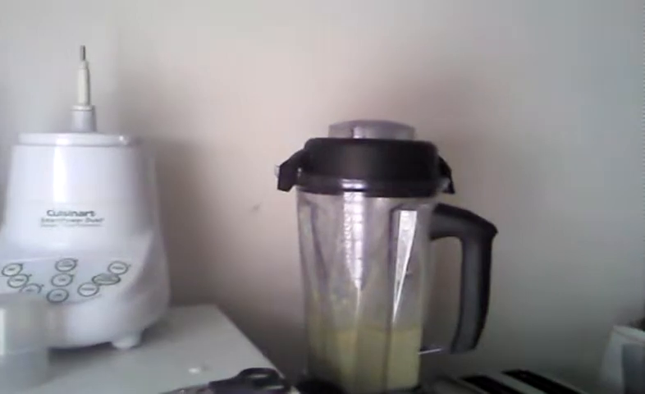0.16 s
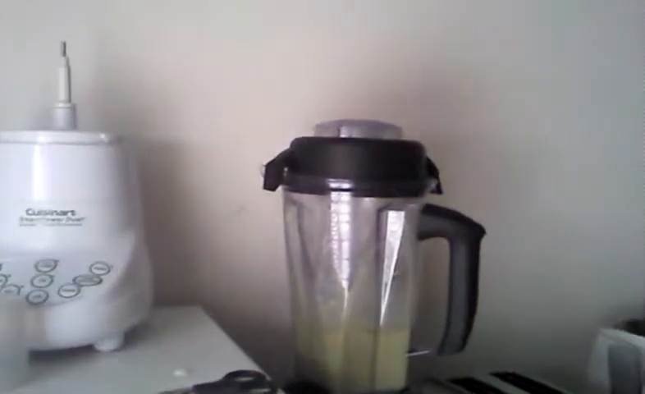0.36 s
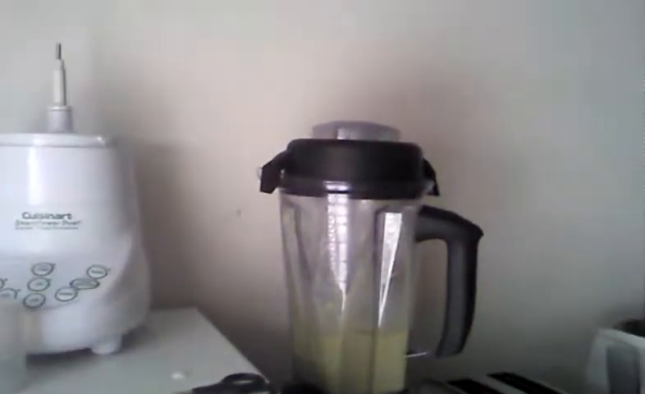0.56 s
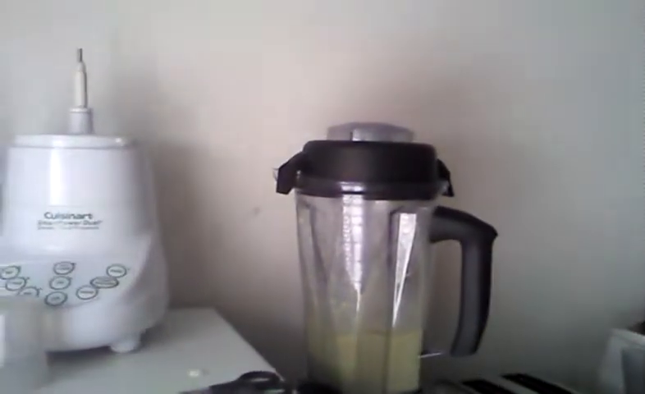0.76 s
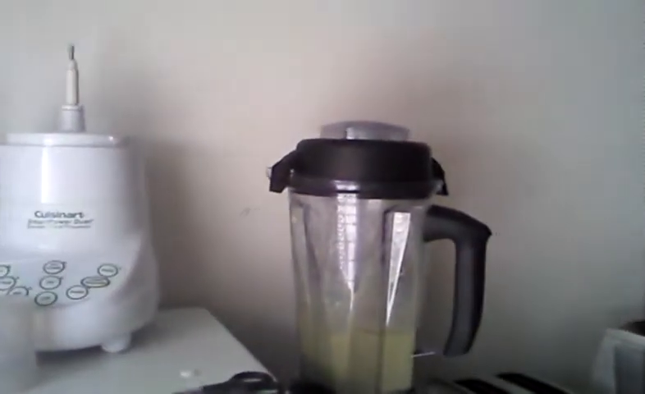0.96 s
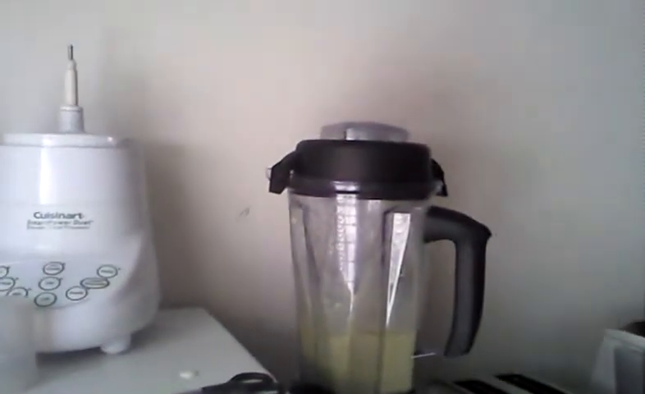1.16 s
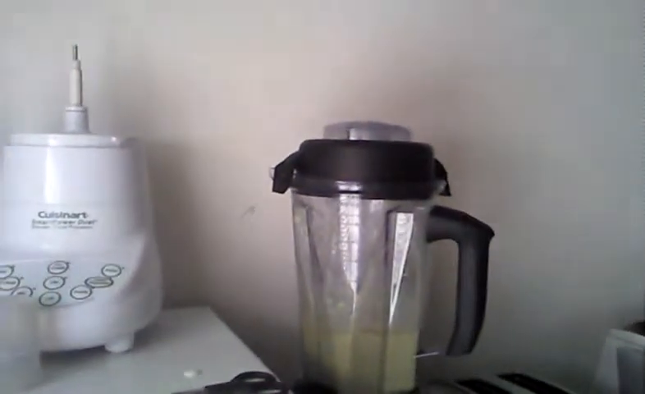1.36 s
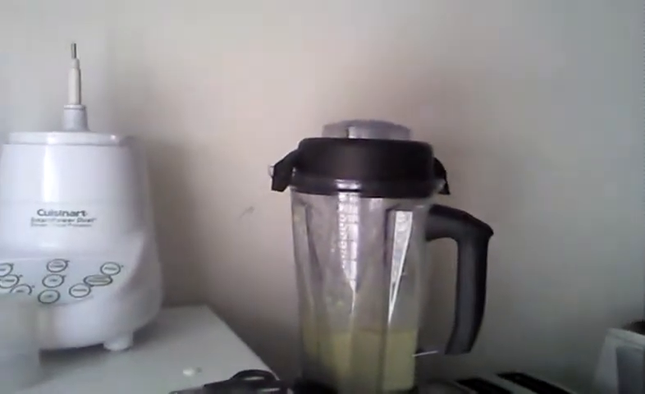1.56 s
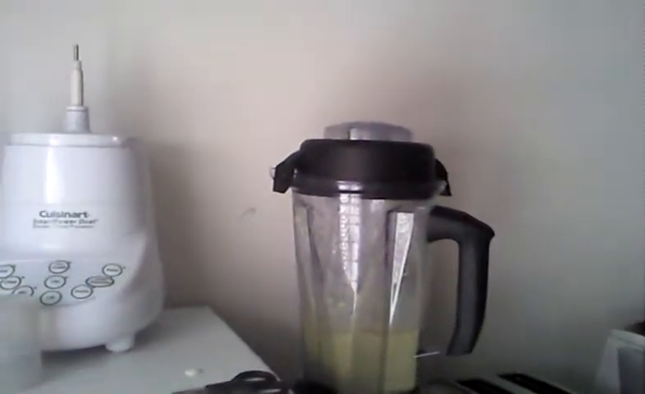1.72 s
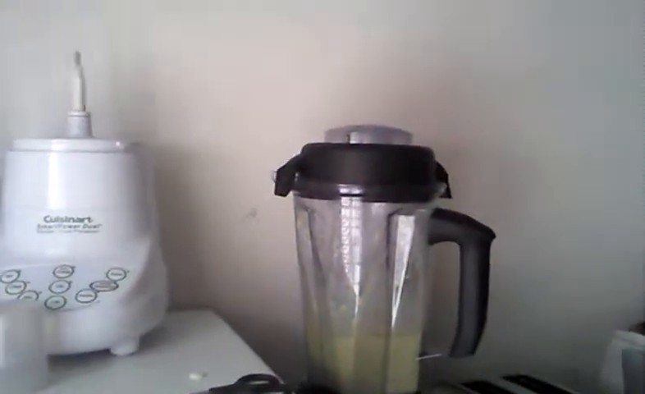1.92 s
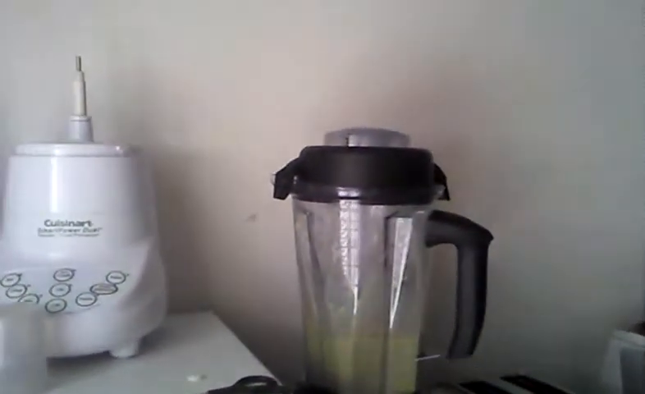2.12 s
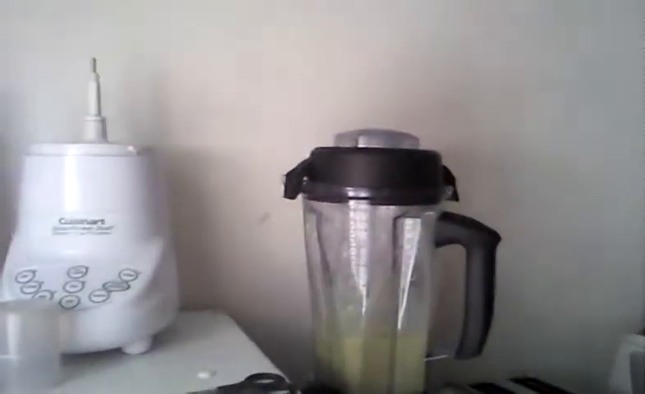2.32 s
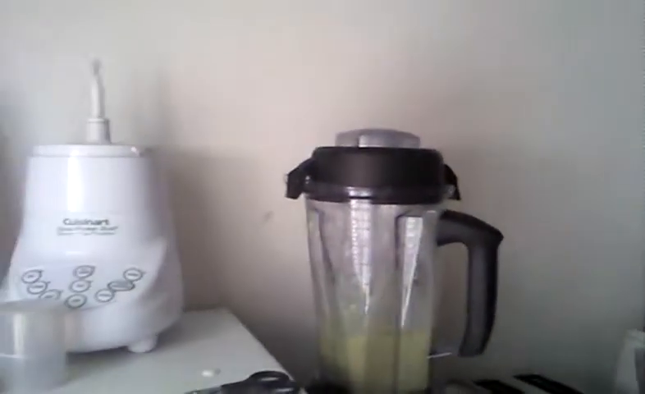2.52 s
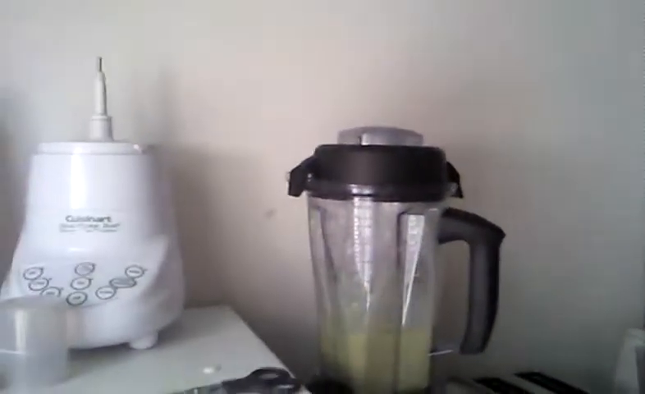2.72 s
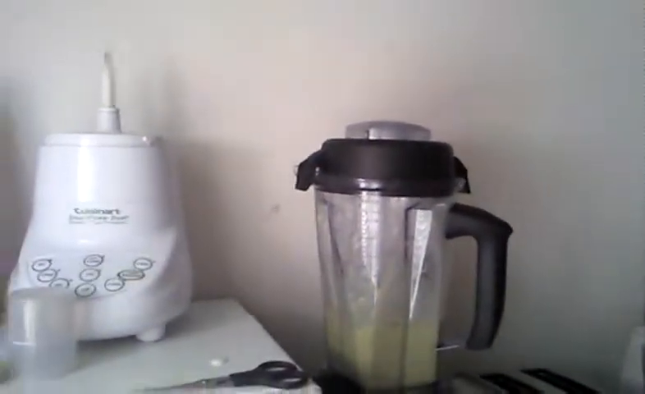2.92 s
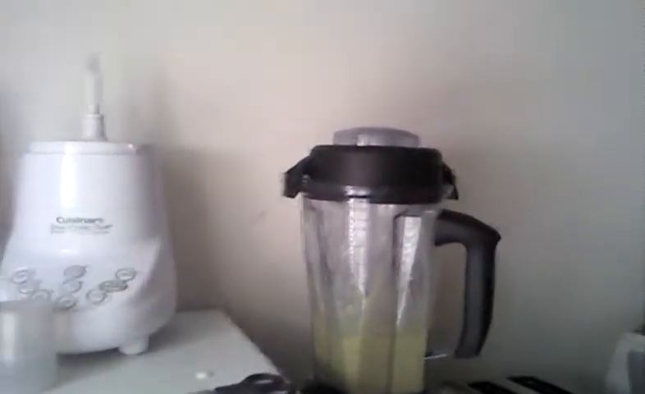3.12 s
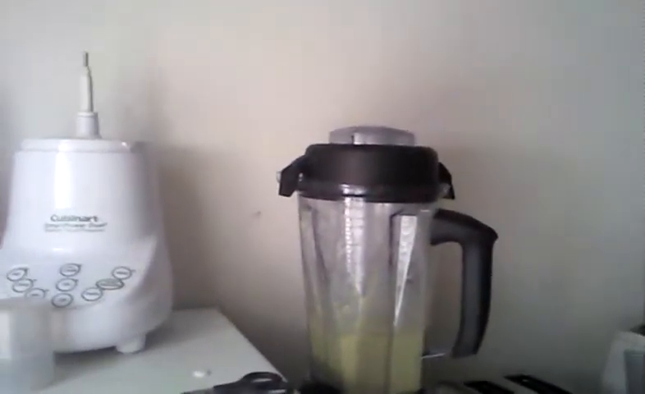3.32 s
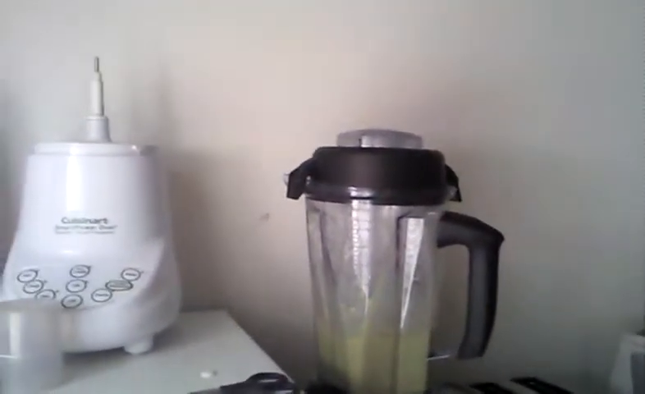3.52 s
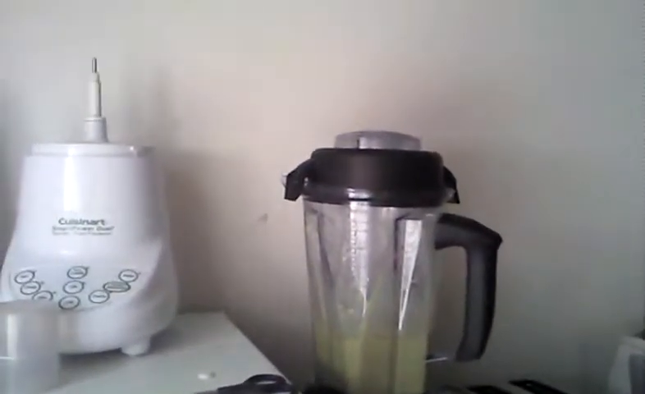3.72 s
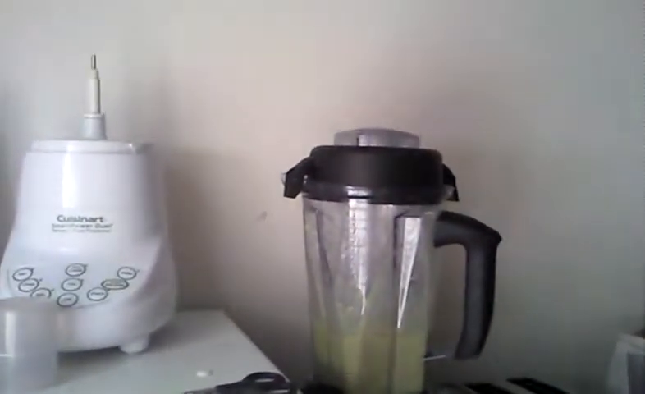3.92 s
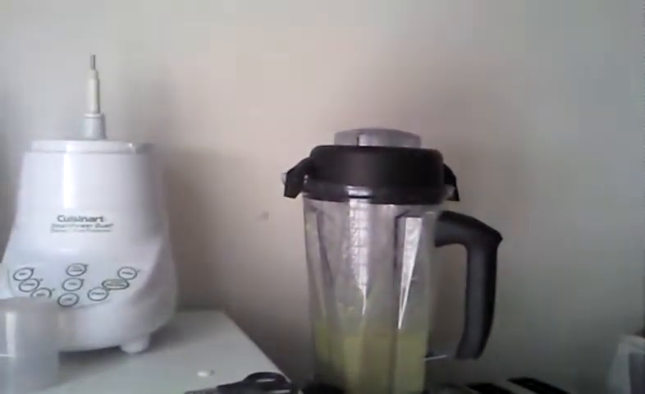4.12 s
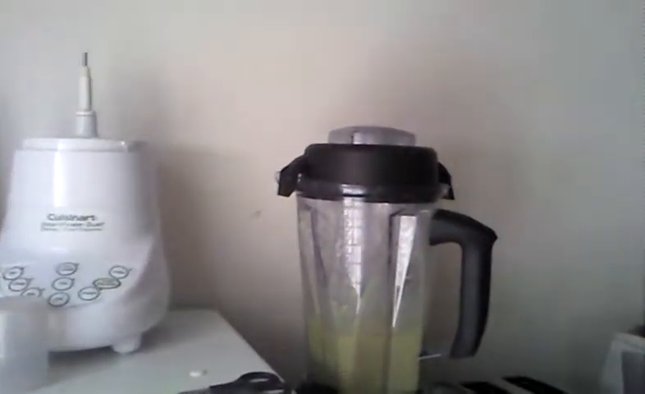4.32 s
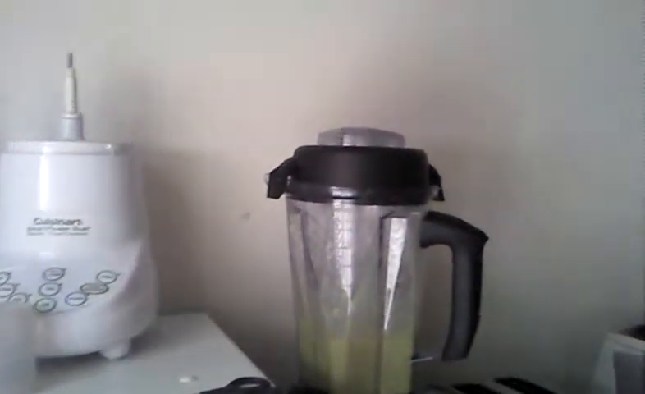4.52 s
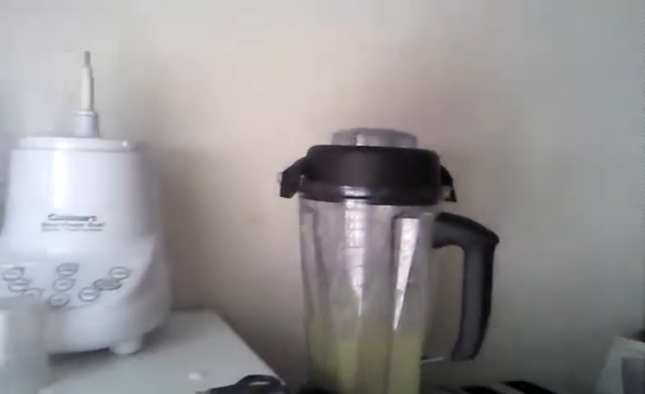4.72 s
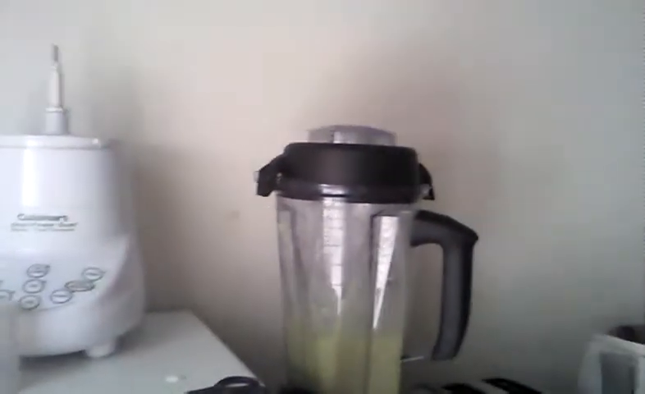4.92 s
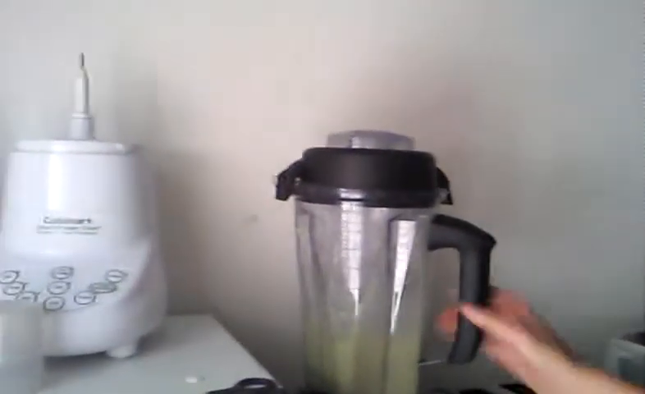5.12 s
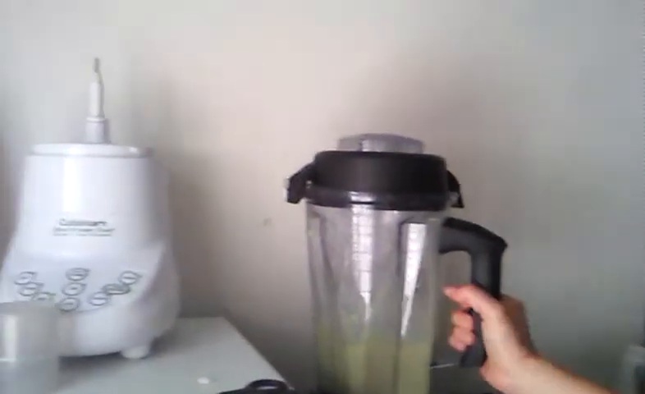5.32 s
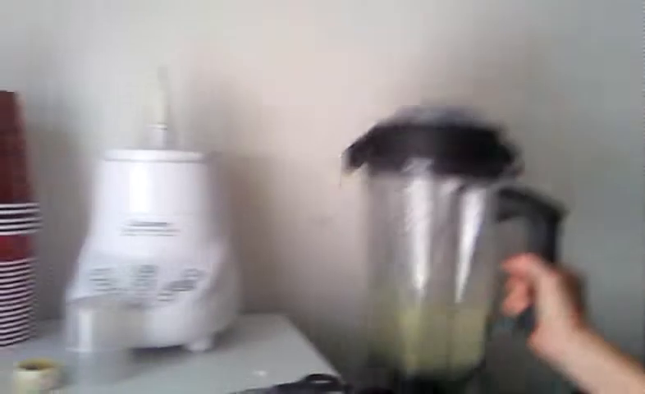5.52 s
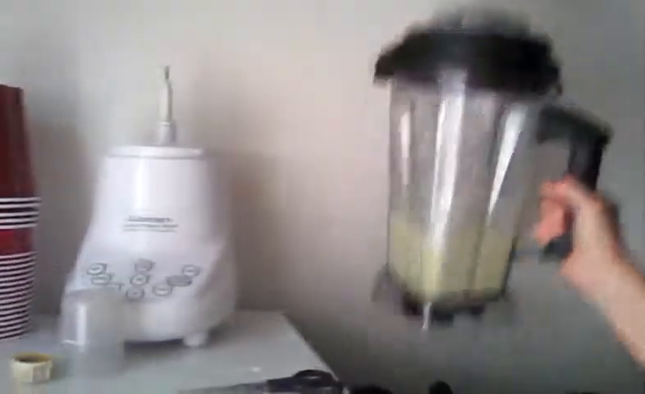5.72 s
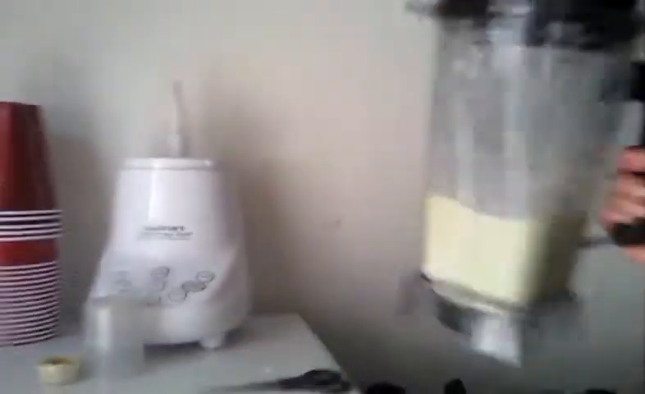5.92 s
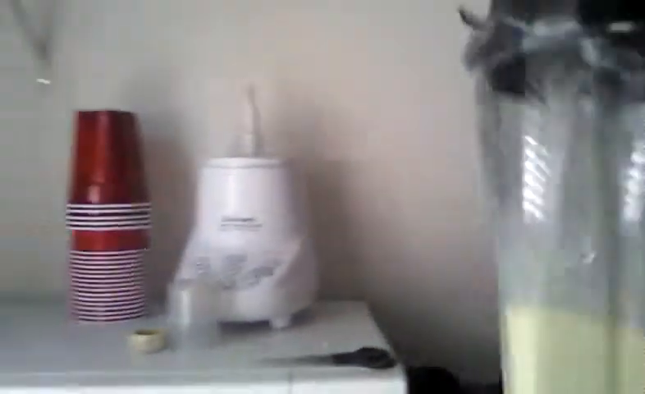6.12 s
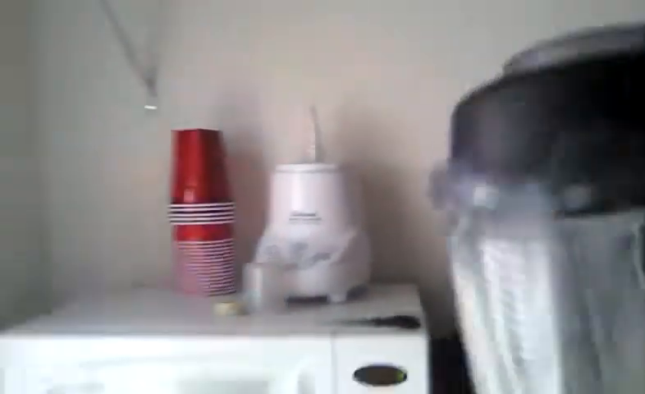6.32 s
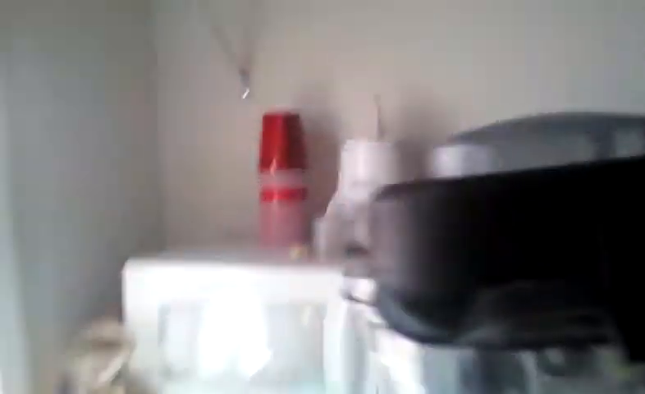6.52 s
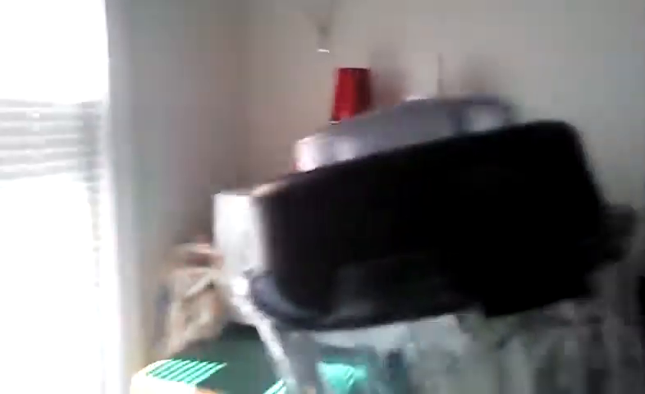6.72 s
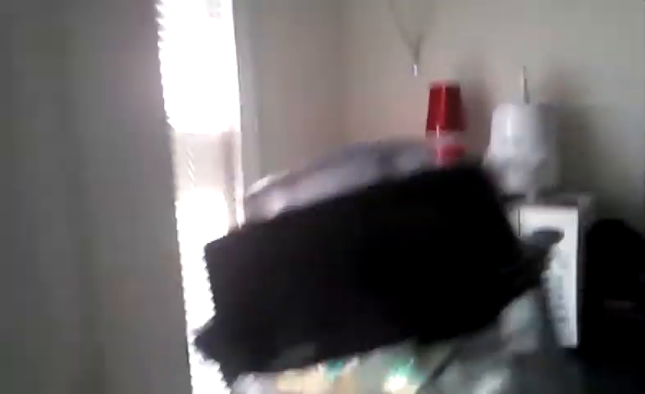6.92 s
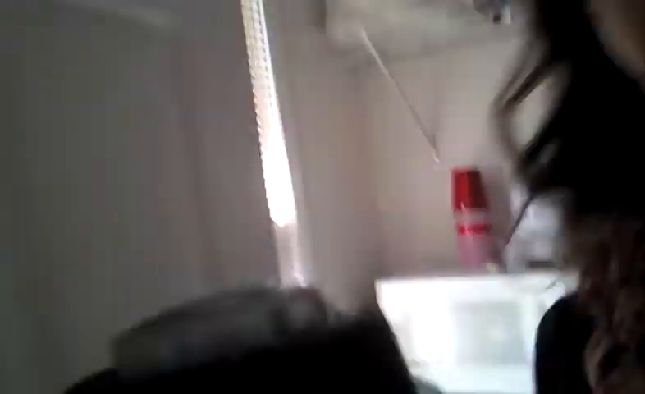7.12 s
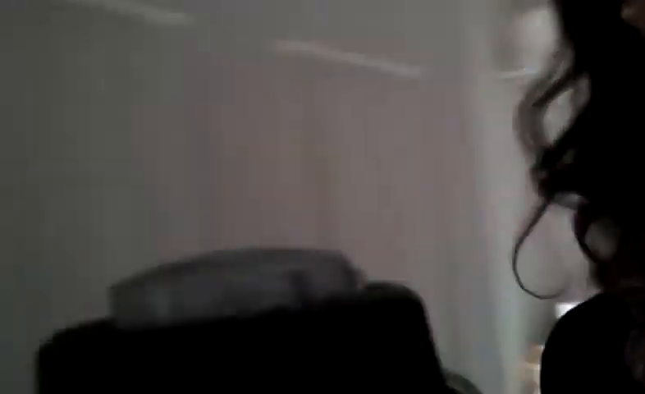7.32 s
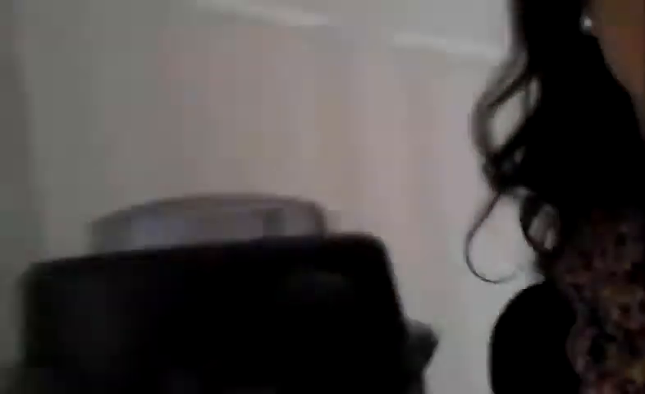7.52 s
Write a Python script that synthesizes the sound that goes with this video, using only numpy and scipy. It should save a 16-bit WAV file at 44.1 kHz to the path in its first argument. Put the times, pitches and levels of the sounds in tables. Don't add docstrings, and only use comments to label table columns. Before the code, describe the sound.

Harsh, distorted blender roar surges through thick liquid, coasts down with a hard switch snap, then squeaky jar removal, thuds, ticks and light sloshing.

```python
import sys
import numpy as np
from scipy import signal
from scipy.fft import rfft, irfft, next_fast_len
from scipy.io import wavfile
from scipy.ndimage import uniform_filter1d

SR = 44100
rng = np.random.default_rng(int(sys.argv[2]) if len(sys.argv) > 2 else 0)


def makeup_ratio(level_db):
    decades = np.asarray(level_db, float) / 20
    return 10 ** decades


def unload_audio(sound):
    columns = np.transpose(np.atleast_2d(sound))
    steps = np.round(np.clip(columns, -1, 1) * 32767)
    wavfile.write(sys.argv[1], SR, steps.astype(np.int16))


N = 337800


def noise():
    return rng.standard_normal(N)


def rms_one(x):
    return x / np.sqrt(np.mean(x ** 2) + 1e-20)


def in_time(rows):
    s, *columns = np.transpose(rows)
    t = np.arange(N) / SR
    gate = np.clip(np.minimum(t - s[0] + .03, s[-1] + .03 - t) / .03, 0, 1)
    return [np.interp(t, s, c) for c in columns] + [gate]


def swell(s, half):
    near = slice(max(int((s - 3 * half) * SR), 0), int((s + 3 * half) * SR))
    return near, np.exp(-((np.arange(N)[near] / SR - s) / half) ** 2)


def drift(rate):
    r = np.exp(-80 * np.pi * rate / SR)
    slow = signal.lfilter([1], [1, -2 * r, r * r], rng.standard_normal(N // 40 + 2002))[2000:]
    return np.interp(np.arange(N) / 40, np.arange(len(slow)), rms_one(slow))


def colour(x, spectrum):
    size = next_fast_len(N)
    hz, level_db = np.transpose(spectrum)
    bin_hz = np.arange(size // 2 + 1) * SR / size
    gain = makeup_ratio(np.interp(np.log(bin_hz + 1), np.log(hz), level_db, right=-120))
    return rms_one(irfft(rfft(x, size) * gain, size)[:N])


def ring(x, hz, t60):
    r, w = makeup_ratio(-60 / (t60 * SR)), 2 * np.pi * hz / SR
    return signal.lfilter([0, np.sin(w)], [1, -2 * r * np.cos(w), r * r], x + 1e-18)


def grains(per_s, spread_db):
    sizes = makeup_ratio(spread_db * np.minimum(rng.exponential(1, N), 5)) * rng.choice([-1, 1], N)
    return rms_one(sizes * (rng.random(N) < per_s / SR))


def add_hit(out, s, peak_db, body):
    at = round(s * SR)
    body = body[:N - at]
    out[at:at + len(body)] += makeup_ratio(peak_db) * body / np.abs(body).max()


# (frequency [Hz], level [dB per Hz])
ROOM_SPECTRUM = [(15, -56.5), (25, -24), (151, -2.5), (307, -15.5), (399, -17), (614, -25.5), (763, -15.5),
                 (850, -17.5), (989, -25.5), (3320, -39), (4400, -56.5), (5720, -83), (9680, -120)]


def room_tone():
    return makeup_ratio(-43 + 1.5 * drift(5.1)) * colour(noise(), ROOM_SPECTRUM)


def kitchen(x):
    t60_s, level_db = .18, -17
    t = np.arange(int(.4 * SR)) / SR
    tail = rng.standard_normal(len(t)) * makeup_ratio(-60 * t / t60_s) * (t > .004)
    tail = signal.lfilter([1], [1, -.6], tail)
    return x + makeup_ratio(level_db) * signal.fftconvolve(x, tail / np.sqrt(np.sum(tail ** 2)))[:N]


# (time [s], motion [dB])
JAR_MOTION = [(6.3, -50), (6.556, -43.5), (6.662, -40), (6.794, -57), (6.964, -48), (7.15, -37),
              (7.244, -45), (7.38, -51.5), (7.66, -37)]
# (time [s], length [s], level [dB])
LID_SWIPES = [(6.48, 0.064, -56), (6.568, 0.058, -51), (6.627, 0.031, -57), (6.676, 0.03, -51),
              (6.767, 0.039, -54), (6.854, 0.092, -69), (6.965, 0.051, -53), (7.044, 0.025, -44.5),
              (7.08, 0.03, -53), (7.148, 0.047, -49), (7.198, 0.057, -41.5), (7.301, 0.05, -40.5),
              (7.408, 0.012, -48), (7.431, 0.074, -38), (7.511, 0.046, -46), (7.578, 0.02, -45),
              (7.605, 0.065, -43.5)]


def carry():
    motion_db, on = in_time(JAR_MOTION)
    slosh = colour(noise(), [(300, 6), (700, -2.5), (1250, -2.5), (1800, -17.5), (2500, -24)])
    grip = colour(noise(), [(90, -14), (170, 2.5), (280, -4), (400, -2.0), (600, -14)])
    fine = .4 * grains(2500, spread_db=2.1) + noise()
    rustle = colour(fine, [(1200, -8), (2000, -6.5), (2900, -3.5), (3500, 0.0), (4000, -9.5), (4800, -26)])
    t = np.arange(N) / SR
    pressure = on * makeup_ratio(-62)
    for s, length, level_db in LID_SWIPES:
        onset, release = (t - s) / 0.0056, (s + length - t) / 0.026 + .5
        pressure += makeup_ratio(level_db) * np.clip(np.minimum(onset, release), 0, 1)
    return on * makeup_ratio(motion_db) * (makeup_ratio(-2) * grip + makeup_ratio(2.5) * slosh) + pressure * rustle


# (time [s], peak [dB], length [s])
CAP_SHAKES = [(6.629, -31.5, 0.03), (7.082, -22, 0.016), (7.125, -41, 0.018), (7.196, -29.5, .02),
              (7.217, -26, 0.015), (7.514, -17, 0.022), (7.546, -24, 0.011)]
# (frequency [Hz], level [dB], t60 [s])
CAP_MODES = [(746, -5.5, 0.086), (1100, 1, 0.024), (1267, -1.5, 0.049), (1480, -4, 0.021)]


def chatter():
    out = np.zeros(N)
    t = np.arange(SR // 10) / SR
    for s, peak_db, length in CAP_SHAKES:
        taps = rng.standard_normal(len(t)) * (rng.random(len(t)) < 1500 / SR) * (t < length)
        taps[0] = 1.7
        body = sum(makeup_ratio(db) * ring(taps, hz, t60) * (-1) ** k for k, (hz, db, t60) in enumerate(CAP_MODES))
        add_hit(out, s, peak_db, body)
    return out


# (time [s], peak [dB], frequency [Hz], puff t60 [s], ring t60 [s])
LID_TICKS = [(6.534, -25, 800, 0.0062, 0.0033), (7.024, -28, 3650, .008, 0.0023),
             (7.159, -19, 900, .006, .002), (7.158, -28, 2800, .008, 0.0098),
             (7.3638, -16, 2400, 0.0091, 0.002), (7.404, -9, 1380, 0.0044, 0.004),
             (6.424, -39, 3000, .012, .003), (7.3665, -27, 2300, .008, .002),
             (7.4042, -17, 2200, .003, .0015), (7.4075, -32, 1500, .01, .003),
             (7.586, -31, 2400, .012, .001), (3.1, -9, 1900, .01, 0.0022)]


def ticks():
    out = np.zeros(N)
    t = np.arange(SR // 12) / SR
    for s, peak_db, hz, puff_t60, ring_t60 in LID_TICKS:
        puff = 0.24 * rng.standard_normal(len(t)) * makeup_ratio(-60 * t / np.clip(puff_t60, .001, .1))
        puff[0] = 1
        add_hit(out, s, peak_db, ring(puff, hz, np.clip(ring_t60, .0005, .05)))
    return out


def blows(events, low_modes, high_modes, contact_s, rebound):
    out = np.zeros(N)
    push = np.hanning(int(contact_s * SR) + 3)
    width = len(push)
    push /= push.sum()
    for s, peak_db, bright_db, ring_factor in events:
        soft, edge = np.zeros((2, min(SR // 3, N - round(s * SR))))
        soft[:width] = push
        soft[2 * width:3 * width] = rebound * push
        edge[width // 2] = makeup_ratio(bright_db)
        struck = [(soft, *mode) for mode in low_modes] + [(edge, *mode) for mode in high_modes]
        body = np.zeros(len(soft))
        for kick, hz, db, t60 in struck:
            strength, detune, sign = rng.standard_normal(3)
            mode = ring(kick, hz * (1 + 0.046 * detune), t60 * np.clip(ring_factor, .2, 4))
            body += (np.sign(sign) if rebound else 1) * makeup_ratio(db + 1.5 * strength) * mode
        add_hit(out, s, peak_db, body)
    return signal.sosfilt(signal.butter(4, 140, "high", fs=SR, output="sos"), out)


# (time [s], peak [dB], brightness [dB], ring factor [ratio])
JAR_THUDS = [(6.422, -15, -9.5, 0.88), (6.438, -9.5, -16, 0.19), (6.467, -23, -12, 1),
             (6.538, -25, -14, 0.59), (6.585, -25.5, -14, 0.7), (6.633, -23, -10, 0.88),
             (6.648, -25.5, -18, 0.94), (7.0195, -1.9, -12, 0.91), (7.035, -4.5, -11, 1),
             (7.05, -10.5, -27, 1), (7.088, -5, -10.5, 0.75), (7.094, -13.5, -16, 1),
             (7.126, -11.5, -13, 0.39), (7.157, -21.5, -28, 0.93), (7.555, -14, -6, 0.44),
             (7.566, -20, -15, 0.55), (7.586, -13, -4, 0.54), (7.606, -24, -21, 0.7), (7.027, -24, -20, .5),
             (7.622, -30, -20, .6), (6.505, -25, -15, .7)]
# (frequency [Hz], level [dB], t60 [s])
FULL_JAR_MODES = [(191, 3, 0.19), (235, -10.5, 0.03), (291.5, 0, 0.1), (354, 2.5, 0.091), (470, -4, 0.06)]
JAR_WALL_MODES = [(565, -3.5, 0.055), (716, -5, 0.029), (960, -6.5, 0.018), (3540, -18, .015)]


def thuds():
    return blows(JAR_THUDS, FULL_JAR_MODES, JAR_WALL_MODES, 0.00293, rebound=-0.9)


# (time [s], peak [dB], brightness [dB], ring factor [ratio])
SWITCH_SNAPS = [
    (4.7497, -1, 1, 0.63),
    (4.757, -7.5, -6, .7),
    (4.769, -12.5, -7, 1),
]
# (frequency [Hz], level [dB], t60 [s])
BASE_MODES = [(375, -7.5, 0.077), (630, 0.5, 0.13), (500, 3, 0.065), (1130, -9, .06), (1580, -3, 0.065),
              (2470, -14, 0.037), (3180, -22.5, 0.0303)]


def switch_off():
    return blows(SWITCH_SNAPS, BASE_MODES[:3], BASE_MODES[3:], .0002, rebound=0)


def rub(contacts):
    t = np.arange(N) / SR
    gain = np.zeros(N)
    for s, hold, db, rise, fall in contacts:
        gain += makeup_ratio(db - np.maximum(rise * (s - t), 0) - np.maximum(fall * (t - s - hold), 0))
    return gain


# (time [s], squeal [Hz], squeal level [dB])
SQUEAL = [(5.3, 1520, -33), (5.368, 1408, -27), (5.414, 1573, -21), (5.452, 1610, -20), (5.5, 1705, -28),
          (5.55, 1680, -30), (5.596, 1630, -39.5), (5.655, 1684, -40.5), (5.7, 1610, -58)]
# (hold start [s], hold [s], level [dB], rise [dB/s], fall [dB/s])
JAR_WALL_RUBS = [(5.368, 0.0093, -30, 343, 138), (5.512, 0.11, -29, 340, 152), (5.65, 0.029, -47, 296, 700),
                 (5.44, .03, -46, 298, 302)]
MOTOR_BASE_RUBS = [(5.375, 0.12, -19.5, 260, 450), (5.532, 0.032, -41.5, 300, 300),
                   (5.7, 0.044, -49, 30, 300)]


def lift():
    squeal_hz, squeal_db, on = in_time(SQUEAL)
    slips = grains(2400, spread_db=1.0) + 0.75 * noise()
    width = signal.butter(2, 85.0, fs=SR, output="sos")
    turn = 2 * np.pi * np.cumsum(squeal_hz) / SR
    squeal = sum(signal.sosfilt(width, slips * f(turn)) * f(turn) for f in (np.sin, np.cos))
    tip = makeup_ratio(-12.0) * rms_one(ring(slips, 3536, 0.021))
    wall = ring(slips, 1210, 0.057) - 0.5 * ring(slips, 1080, 0.024)
    rumble = ring(slips, 167, 0.069) - ring(slips, 286, 0.15)
    rumble += ring(slips, 358.4, 0.12) - .5 * ring(slips, 620, 0.018)
    out = makeup_ratio(squeal_db) * (rms_one(squeal) + tip)
    out += rub(JAR_WALL_RUBS) * rms_one(wall) + rub(MOTOR_BASE_RUBS) * rms_one(rumble)
    return on * out


# (frequency [Hz], level [dB])
MOUNT_RESPONSE = [(41, -70), (72, -45), (115, -39.5), (205, -29), (262, -14.5), (283, -8), (303, -15),
                  (332, -8)]


def unbalance(hz, phase, sway_db):
    mount_hz, mount_db = np.transpose(MOUNT_RESPONSE)
    tone_db = np.interp(np.log(hz), np.log(mount_hz), mount_db) + sway_db
    waver_db = np.where(hz > 255, 1.2, 2.6) * drift(43)
    return np.sqrt(2) * makeup_ratio(tone_db + waver_db) * np.sin(phase)


# (time [s], multiple [ratio], level [dB], half length [s])
RESONANCE_CROSSINGS = [(0.41, 1.19, -22.5, 0.15), (1.55, 1.17, -15.5, 0.2), (1.997, 1.2, -14.5, 0.12),
                       (4.4, 1.95, -22, 0.075), (2, 4.42, -19.5, 0.055), (4.42, 5.95, -33, .1),
                       (4.61, 2.0, -30.5, 0.13), (4.852, 2.0, -29.5, 0.11), (4.575, 2.52, -29, 0.07),
                       (4.99, 2.5, -28, 0.08), (5.156, 2.45, -28.5, 0.07), (5.19, 2.9, -27, 0.07),
                       (5.24, 1.95, -30, 0.045), (5.85, 4.25, -45, 0.12), (3.988, 1.1, -24, 0.04),
                       (1.23, 1.07, -13, 0.1), (4.89, 8.5, -25.5, 0.068), (5.02, 8.6, -29.5, 0.025),
                       (5.84, 11.4, -52, 0.05), (5.81, 20.8, -50, 0.07), (3.05, 2.05, -23, 0.25),
                       (5.9, 10.6, -49, .03), (6.17, 18.5, -53, 0.05),]
MORE_CROSSINGS = [(5.74, 44.1, -60, .04), (6.03, 60.5, -62, .03), (6.11, 61.6, -62, .035)]


def multiples(phase, twist):
    out = np.zeros(N)
    shake = .045 * twist
    flutter = makeup_ratio(2.1 * drift(25))
    for s, multiple, level_db, half in RESONANCE_CROSSINGS + MORE_CROSSINGS:
        if s < 3 * half:
            continue
        near, height = swell(s, half)
        tone = np.sin(multiple * (phase[near] + shake[near]))
        out[near] += np.sqrt(2) * makeup_ratio(level_db) * height * flutter[near] * tone
    return out


# (frequency [Hz], level [dB per Hz])
HOUSING_SPECTRUM = [(25, -33), (60, -10), (150, -7.5), (250, -4), (340, 2), (445, 2.5), (520, -0.5),
                    (710, 0.5), (820, -8.5), (1000, -31)]
JAR_SPECTRUM = [(650, -23), (820, -2.5), (1000, 3.5), (1230, 3), (1400, 2.5), (1580, 2), (1750, -7.5),
                (2000, -30), (2400, -35.5)]
HISS_SPECTRUM = [(1500, -25), (1900, 2), (2300, 0), (2700, -2), (3100, -1), (3500, 1.5), (3750, -3),
                 (4000, -7), (4300, -14), (4800, -26)]


def roar(housing_db, jar_db, hiss_db, vent_db, phase, powered, twist):
    out = np.zeros(N)
    surge = drift(13.6)
    coasting = 1 - powered
    unrest = powered + .7 * coasting
    rattle_db = 1.3 * coasting * twist
    throb = 1 + 0.15 * np.cos(phase)
    bands = (HOUSING_SPECTRUM, housing_db), (JAR_SPECTRUM, jar_db), (HISS_SPECTRUM, hiss_db)
    for spectrum, level_db in bands:
        churn = noise() + (0.5 * powered + .25 * coasting) * grains(1500, spread_db=5.5)
        waver_db = unrest * (1.05 * surge + 1.05 * drift(18)) + rattle_db
        out += makeup_ratio(level_db + waver_db) * throb * colour(churn, spectrum)
    vent = ring(ring(churn, 3520, 0.0024), 3520, 0.0024)
    return out + makeup_ratio(vent_db + 1.5 * rattle_db + surge) * rms_one(vent)


# (frequency [Hz], width [Hz], level [dB])
BODY_MODES = [(178.3, 46, -18.5), (337.2, 21, -7.5), (445, 30, -10), (738.5, 31, -13.5), (875.7, 34, -14),
              (1172, 160, -19), (1245, 47, -9.5), (1578.7, 49, -9.5), (1751, 120, -16)]


def body_modes(body_db, powered, speedup):
    out = np.zeros(N)
    for hz, width_hz, level_db in BODY_MODES:
        wall = hz > 1100
        mode = ring(noise(), hz, 3.9 / width_hz)
        waver_db = (1.2 + 2.57 * powered) * drift(3.76) / (1 + wall)
        out += makeup_ratio(body_db + level_db + wall * .08 * speedup + waver_db) * rms_one(mode)
    return out


# (time [s], turns [Hz])
ROTOR_SPEED = [(0.0, 259.5), (0.16, 279.7), (0.44, 299.4), (0.72, 316.5), (0.97, 320.7), (1.44, 302.2),
               (1.91, 270.9), (1.97, 279.4), (2.51, 324.8), (2.82, 331.3), (3.37, 333.2), (3.54, 301.7),
               (3.88, 254.7), (4.3, 197.2), (4.74, 153.7), (5.2, 109.2), (5.56, 87.8), (6.3, 41)]
# (time [s], load [dB])
BLADE_LOAD = [(0, -0.5), (.28, -1.5), (.4, 0.5), (.85, 1.5), (1.3, 0), (1.75, -2.5), (2.2, 1.5), (2.75, 0),
              (3.0, 2), (3.55, -0.5), (3.72, -2.5), (4.03, -3.5), (4.4, -8.5), (4.7, -11.5), (5.25, -16),
              (5.47, -12.5), (5.65, -34), (6.3, -42)]
# (time [s], churn change [dB], unbalance change [dB], half length [s])
LEVEL_SWELLS = [(0.081, -0.5, -12.5, 0.077), (0.169, -0.5, 5.5, 0.022), (0.236, 0.5, -8, 0.14),
                (2.422, 0.5, 0, 0.025), (1.245, 0, 3, 0.18), (3.96, -0.5, -10.5, 0.095),
                (4.407, 1.5, 3, 0.11), (0.346, 1.5, 4, 0.021), (0.972, -1.5, -3.5, 0.03),
                (1.008, -0.5, 0.5, 0.012), (1.554, 2.5, 1, 0.078), (1.728, -1.5, 2, 0.033),
                (1.904, 1.5, -6.5, 0.027), (2.023, -1, -2.5, 0.099), (2.187, 0.5, -8, 0.026),
                (3.209, -5, 5.5, 0.024), (3.266, 3, -5.5, 0.016), (3.294, 1.5, -3.5, 0.0064),
                (3.333, 3, 1, 0.015), (3.641, 0, 4, 0.074), (3.872, 1.5, -2, 0.034), (4.087, -1, -2, 0.022),
                (3.888, -3.5, -2, .015), (.13, 2.5, 3, .03), (.27, -2, -3, .02), (1.403, -2, 1, .02),
                (2.355, 1.5, 0.5, 0.058), (3.528, 1.7, 2, 0.046), (1.03, 0.3, 1, 0.056),
                (4.136, 2.5, -0.5, .03), (4.186, -3.5, -5, 0.018), (4.329, -2.5, -9, 0.047),
                (4.761, 10, 1, 0.018), (4.852, -0.5, -15, .05), (5.0, -1, -8, 0.028), (5.33, -7, 1, 0.039),
                (5.42, 2.5, 13, 0.03), (5.574, -0.5, -7, .06), (5.819, -1, 7, .05)]


def motor():
    hz, on = in_time(ROTOR_SPEED)
    load_db, _ = in_time(BLADE_LOAD)
    sway_db = np.zeros(N)
    for s, churn_db, unbalance_db, half in LEVEL_SWELLS:
        near, height = swell(s, half)
        load_db[near] += churn_db * height
        sway_db[near] += unbalance_db * height
    phase = 2 * np.pi * np.cumsum(hz * (1 + .003 * drift(25))) / SR
    twist = drift(60)
    powered = np.clip((hz - 240) / 40, 0, 1)
    speedup = powered * np.clip(uniform_filter1d(np.gradient(hz) * SR, size=SR // 8), -60, 60)
    housing_db = -15.5 + 0.98 * load_db
    jar_db = -16.5 + load_db - 0.0221 * speedup
    hiss_db = -24.5 + 1.09 * load_db + 0.02 * (np.maximum(hz, 265) - 300)
    vent_db = -39 + 0.55 * load_db
    out = unbalance(hz, phase, sway_db) + multiples(phase, twist)
    out += roar(housing_db, jar_db, hiss_db, vent_db, phase, powered, twist)
    return on * (out + body_modes((housing_db + jar_db) / 2, powered, speedup))


def scene():
    hits = kitchen(switch_off() + thuds())
    return (room_tone() + carry() + chatter() + ticks() + hits + lift() + motor())[None]


def top_cut(x):
    return signal.sosfilt(signal.butter(12, 15790, fs=SR, output="sos"), x)


def record(dry):
    overload = .705
    narrow = signal.sosfilt(signal.butter(3, 64, "high", fs=SR, output="sos"), dry)
    narrow = signal.sosfilt(signal.butter(10, 3950, fs=SR, output="sos"), narrow)
    narrow = signal.sosfilt(signal.ellip(9, .5, 75, 4450, fs=SR, output="sos"), narrow)
    narrow = narrow * np.clip((N - np.arange(N)) / (.002 * SR), .15, 1)
    mix = np.clip(narrow, -overload, overload)
    return top_cut(mix)


dry = scene()
out = record(dry)
unload_audio(out)
```